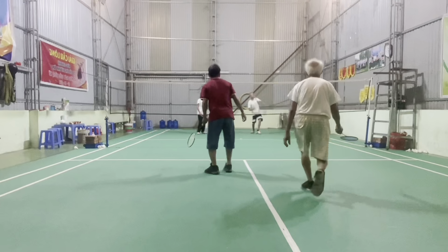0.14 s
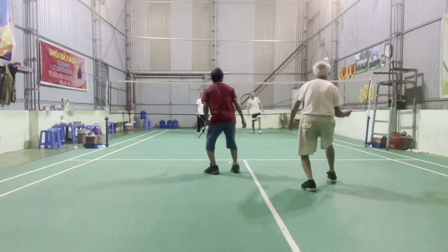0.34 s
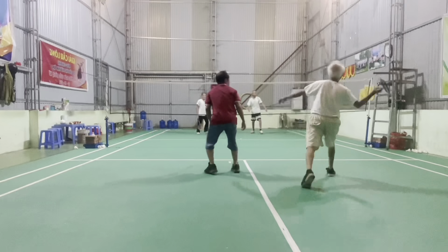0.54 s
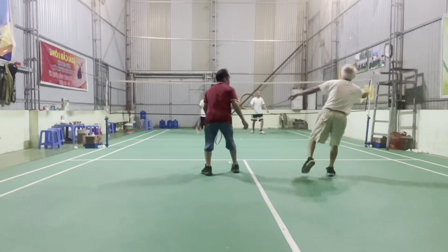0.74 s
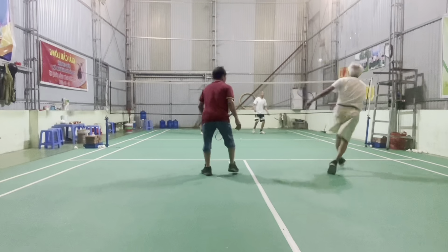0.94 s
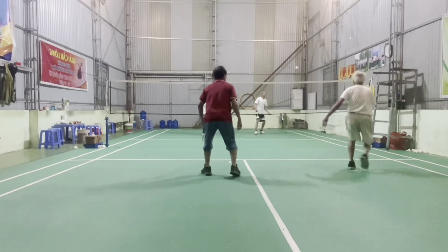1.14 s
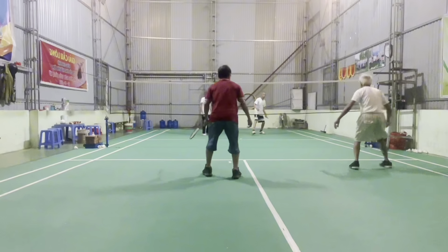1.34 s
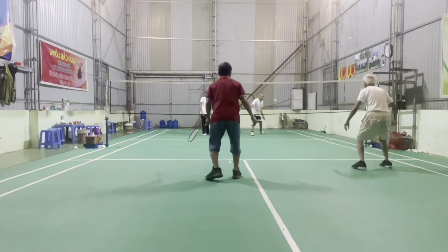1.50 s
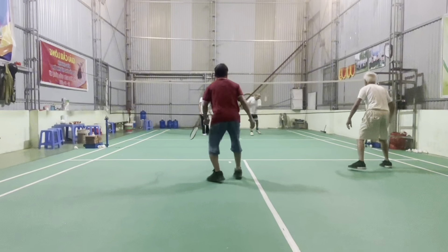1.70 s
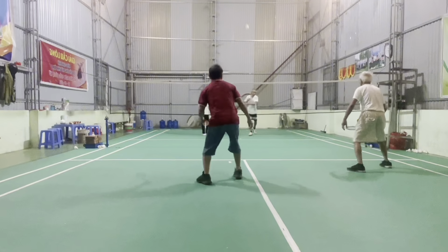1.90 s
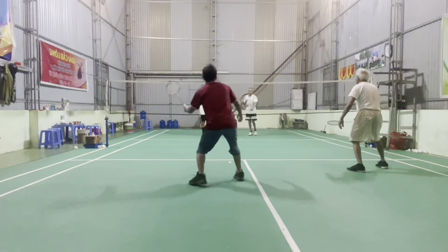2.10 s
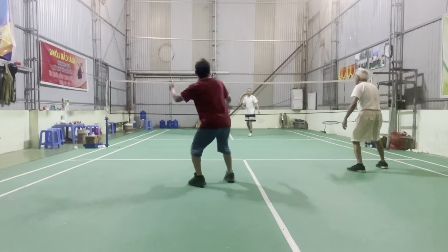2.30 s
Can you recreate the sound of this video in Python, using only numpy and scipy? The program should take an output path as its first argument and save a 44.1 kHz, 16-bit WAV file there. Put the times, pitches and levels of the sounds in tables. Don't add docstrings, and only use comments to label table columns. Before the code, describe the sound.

Badminton rackets strike a shuttlecock: a loud crack at the start, another sharp hit, a weaker one, then a thicker double crack, all echoing in a large metal hall with shoe squeaks, heard on a phone.

```python
import sys
import numpy as np
from scipy import signal
from scipy.fft import rfft, irfft, next_fast_len
from scipy.io import wavfile
from scipy.ndimage import uniform_filter1d, map_coordinates

SR = 44100
rng = np.random.default_rng(int(sys.argv[2]) if len(sys.argv) > 2 else 0)


def wav_out(sig):
    wavfile.write(sys.argv[1], SR, np.round(np.clip(np.atleast_2d(sig).T, -1, 1) * 32767).astype(np.int16))


def makeup_ratio(level_db):
    decades = np.asarray(level_db, float) / 20
    return 10 ** decades


N = 103635


def unit(x):
    return x / np.sqrt(np.mean(x ** 2) + 1e-20)


def along(points, hz):
    f, v = np.transpose(points)
    return np.interp(np.log(hz + 1), np.log(f + 1), v)


def wobble(rate):
    knots = rng.standard_normal(int(N / SR * 2000))
    return map_coordinates(knots, [np.arange(N) * rate / SR])


def filtered(x, response):
    m = next_fast_len(N + SR // 2)
    spectrum = rfft(x, m) * response(np.fft.rfftfreq(m, 1 / SR))
    return irfft(spectrum, m)[..., :N]


def since(start):
    return np.clip(np.arange(N) / SR - start, 0, None)


def stroke(start, length, rise, fall):
    t = np.arange(N) / SR - start
    attack = np.clip(t / rise, 0, 1) ** 2
    return attack * np.exp(-np.clip(t - length, 0, None) / fall)


def resonance(f, hz, sharpness):
    return 1 / np.sqrt(1 + (sharpness * (f / hz - hz / (f + 1))) ** 2)


def hall(x, build_s):
    # (frequency [Hz], t60 [s])
    decay = [(150, 0.62), (350, 1.55), (1000, 2.21), (3000, 2.41), (6000, 2.21), (10000, 1.26),
             (16000, 0.82)]
    # (frequency [Hz], level [dB])
    colour = [(100, -9), (300, -2.5), (600, -1.5), (1000, 1.5), (3000, 1.5), (7000, -1), (14000, 0)]
    patchy_db = 1.5

    hz, t, z = signal.stft(rng.standard_normal(N), SR, nperseg=256)
    patches = uniform_filter1d(rng.standard_normal(z.shape), size=5, axis=0)
    patches = unit(uniform_filter1d(patches, size=8, axis=1))
    fade_db = -60 * t / along(decay, hz)[:, None]
    level_db = patchy_db * patches + along(colour, hz)[:, None] + fade_db
    build_up = 1 - np.exp(-t / build_s)
    tail = signal.istft(z * makeup_ratio(level_db) * build_up, SR, nperseg=256)[1][:N]
    return signal.fftconvolve(x, tail)[:N]


def air():
    # (frequency [Hz], level per Hz [dB])
    hum_colour = [(15, -36), (25, -1), (734, -10), (1020, -3.5), (1160, -9.5), (4740, -15.5), (9070, -21),
                  (14400, -25), (16000, -24.5)]
    hum = filtered(rng.standard_normal(N), lambda hz: makeup_ratio(along(hum_colour, hz)))
    return makeup_ratio(-48.5 + wobble(5.98)) * unit(hum)


def squeaks():
    # (time [s], length [s], pitch [Hz],
    # level [dB])
    slips = [(.04, .04, 990, -58), (.9, .145, 998, -30.5), (1.34, .05, 1003, -44), (1.5, .15, 955, -51),
             (.172, .025, 565, -49)]
    stutter_hz, stutter_depth_db, waver = 44, 4.5, .005

    out, t = np.zeros(N), np.arange(N) / SR
    for s, length, hz, db in slips:
        pitch_hz = hz * (1 + waver * wobble(38.95))
        phase = 2 * np.pi * np.cumsum(pitch_hz) / SR
        stutter_db = stutter_depth_db * np.sin(2 * np.pi * stutter_hz * (t - s) + wobble(20))
        out += makeup_ratio(db + stutter_db) * np.sin(phase) * stroke(s, length, 0.0064, 0.005)
    return out


def scuffs():
    # (time [s], length [s], level [dB], lower edge
    # [Hz], centre [Hz])
    slides = [(0.089, 0.064, -50, 696, 1720), (0.167, 0.11, -42.5, 393, 553), (0.74, .04, -52, 8000, 13000),
              (1.365, 0.056, -48.5, 2000, 11500), (1.599, 0.04, -46, 4990, 12500),
              (2.036, 0.041, -40, 2010, 10600), (2.17, 0.046, -45.5, 2500, 8200),
              (2.323, 0.059, -44.5, 1020, 7060)]
    rise_s, fall_s, grit_db, tail_db = .02, .022, 1.5, -40.5

    out = np.zeros(N)
    for s, length, db, low_hz, hz in slides:
        def band(f):
            return resonance(f, hz, 1.45) / (1 + (low_hz / (f + 1)) ** 2)
        hiss = unit(filtered(rng.standard_normal(N), band))
        grit = makeup_ratio(grit_db * wobble(440))
        out += makeup_ratio(db) * hiss * grit * stroke(s, length, rise_s, fall_s)
    return out + makeup_ratio(tail_db) * hall(out, .02)


def crack_burst(t, colour):
    rise_s, t60_s = 0.0022, .04
    burst = np.tanh(t / rise_s) * makeup_ratio(-60 * t / t60_s) * rng.standard_normal(N)
    return filtered(burst, lambda hz: makeup_ratio(along(colour, hz)))


def crack_click(t, colour):
    click = np.diff(1. * (t > 0), prepend=0)
    return filtered(click, lambda hz: makeup_ratio(along(colour, hz)))


def string_ring(t, modes):
    return sum(makeup_ratio(db - 60 * t / t60) * np.sin(2 * np.pi * hz * t) for hz, db, t60 in modes)


def rackets():
    # (time [s], direct [dB], hall [dB], strings over crack [dB], hall build-up [s])
    blows = [(.198, -15.5, -17, -12, 0.032), (.803, -19, -29, -3.5, 0.012), (1.101, -31, -37.5, -1.5, 0.02),
             (1.799, -27, -28, -6, 0.0067), (1.832, -37, -33.5, -4, 0.014)]
    # (frequency [Hz], level per Hz [dB])
    cracks = [
        [(59, -49), (100, -61.5), (322, -12.5), (461, -17.5), (595, -2.5), (3050, -18.5), (3780, -15.5),
         (14400, -21), (16000, -26)],
        [(59, -49), (100, -35), (373, -2.5), (836, -4.5), (950, -4), (2170, -12.5), (2990, -12), (13500, -24),
         (16000, -31)],
        [(100, -26), (350, -8), (1000, -9.5), (2200, -2.5), (2600, -4.5), (3800, -4.5), (4200, -13),
         (16000, -26.5)],
        [(59, -78), (100, -14.5), (991, 0), (1150, -14), (1720, -20), (2630, -24), (3780, -25), (8640, -18),
         (16000, -27)],
        [(710, -11), (1200, 0.5), (2950, -3), (3430, -2), (6720, -1), (13600, -17.5), (16000, -59)],
    ]
    # (frequency [Hz], level [dB], t60 [s])
    strings = [
        [(593, -3.5, 0.015), (820, 0.5, 0.021), (1285, -8, 0.023), (2130, -22, 0.12), (3700, 3, 0.005)],
        [(379, 0, 0.038), (960, 0, 0.026), (1576, -2, 0.014), (3070, -14.5, 0.025)],
        [(568, -9.5, 0.044), (1014, -12, 0.065), (1680, -10, 0.017), (2680, -28, 0.06), (3460, -11, 0.012)],
        [(462, -6, 0.025), (720, -0.5, 0.018), (991, -7, 0.048)],
        [(2100, -2, 0.047), (2554, 0.5, 0.031), (3005, 3, .035)],
    ]
    # (delay [s], level over the direct [dB])
    walls = [
        [(.007, 4.5), (.02, 3.5), (.036, 5), (.047, 3.5), (.058, 0), (.11, -24)],
        [(.008, -11), (.03, -14.5), (.048, -15)],
        [(.007, 0.5), (.045, -17)],
        [(.012, 0), (.023, 9.5), (.047, 3.5), (.063, 4.5), (.115, -0.5)],
        [(.02, 1.5), (.04, -2)],
    ]
    low_cut_hz = 104

    def blow(crack, ring, strings_db):
        return crack / np.linalg.norm(crack) + makeup_ratio(strings_db) * ring / np.linalg.norm(ring)

    out = np.zeros(N)
    for (s, direct_db, hall_db, strings_db, build_s), colour, modes, echoes in zip(blows, cracks, strings, walls):
        near = np.zeros(N)
        for delay, db in [(0, 0)] + echoes:
            t = since(s + delay)
            near += makeup_ratio(db) * blow(crack_burst(t, colour), string_ring(t, modes), strings_db)
        t = since(s)
        clean = blow(crack_click(t, colour), string_ring(t, modes), strings_db)
        out += 10 * makeup_ratio(direct_db) * near + makeup_ratio(hall_db) * hall(clean, build_s)
    return filtered(out, lambda hz: 1 / (1 + (low_cut_hz / (hz + 1)) ** 4))


def heels():
    # (time [s], level [dB], centre [Hz], t60 [s])
    landings = [(0.631, -37.5, 304, 0.67), (.66, -71, 60, 0.37), (0.804, -33, 260, 0.089),
                (1.12, -45, 142, 0.23), (1.33, -47.5, 315, 0.59), (1.824, -37.5, 60, 0.24),
                (2.11, -42, 186, 0.86), (2.218, -38, 225, 0.35)]
    out = np.zeros(N)
    for s, db, hz, t60 in landings:
        t = since(s)
        rumble = unit(filtered(rng.standard_normal(N), lambda f: resonance(f, hz, 0.88) ** 2))
        out += makeup_ratio(db - 60 * t / t60) * rumble * (1 - np.exp(-t / .006))
    return out


def scene():
    mono = air() + squeaks() + scuffs() + rackets() + heels()
    return np.array([mono, mono])


def low_pass(x):
    return signal.sosfilt(signal.butter(12, 16640, fs=SR, output="sos"), x)


def record(dry):
    # (frequency [Hz], level [dB])
    gate = [(100, -49.5), (250, -58), (600, -60.5), (1000, -61.5), (2000, -61), (3300, -65), (3900, -62.5),
            (4300, -62.5), (12000, -75)]
    # (time [s], share of the memory taken for noise [dB])
    grip = [(0, 1), (.78, -16), (.82, -34), (1.35, -18.5), (1.55, -13.5), (1.78, -3), (1.8, -15),
            (2.1, -12.5), (2.35, -12)]
    # (frequency [Hz], level [dB])
    grip_ease = [(100, -23), (300, 0.5), (950, 1), (1800, 6), (3300, 1), (4200, -2.5), (12000, -2)]
    depth_db, steep, hold, learn_s = -17, 1.4, .85, 1.9
    ceiling, top_hz = .55, 15950

    hz, t, z = signal.stft(dry[0], SR, nperseg=512, noverlap=384)
    power = uniform_filter1d(np.abs(z) ** 2, size=5, axis=0)
    power = np.maximum(signal.lfilter([1 - hold], [1, -hold], power), power / 4)
    keep = np.exp(-(t[1] - t[0]) / learn_s)
    memory = uniform_filter1d(signal.lfilter([1 - keep], [1, -keep], power), size=5, axis=0)
    grip_db = np.interp(t, *np.transpose(grip)) + along(grip_ease, hz)[:, None]
    threshold = makeup_ratio(2 * along(gate, hz)[:, None]) + makeup_ratio(2 * grip_db) * memory
    over = np.abs(power / threshold) ** steep
    gain = (over + makeup_ratio(depth_db)) / (over + 1)
    mono = signal.istft(z * gain, SR, nperseg=512, noverlap=384)[1][:N]
    rounded = ceiling * np.tanh(np.array([mono, mono]) / ceiling)
    return low_pass(filtered(rounded, lambda f: f < top_hz))


dry = scene()
out = record(dry)
wav_out(out)
```